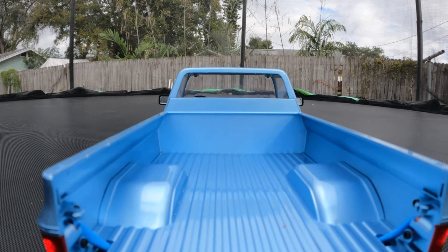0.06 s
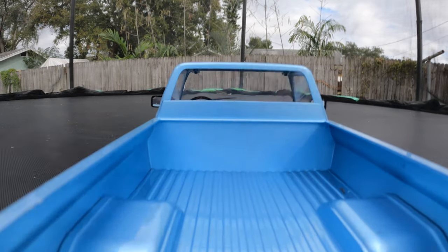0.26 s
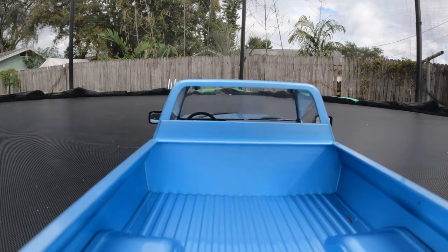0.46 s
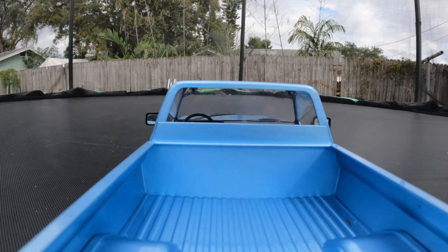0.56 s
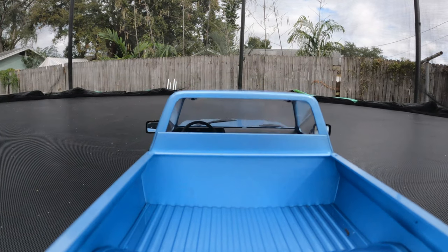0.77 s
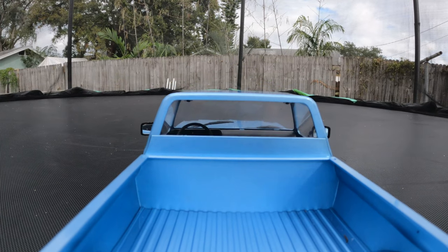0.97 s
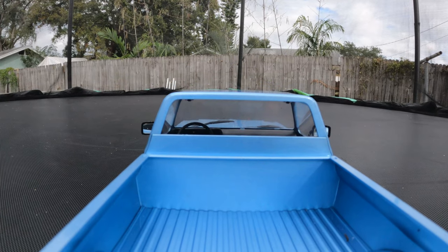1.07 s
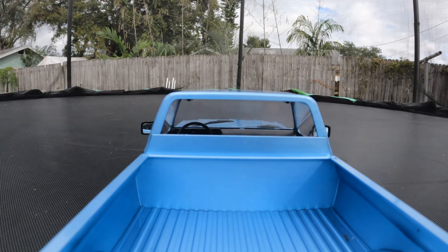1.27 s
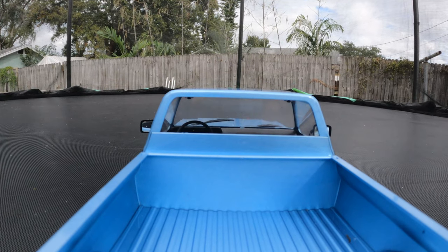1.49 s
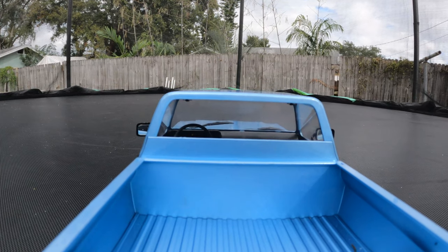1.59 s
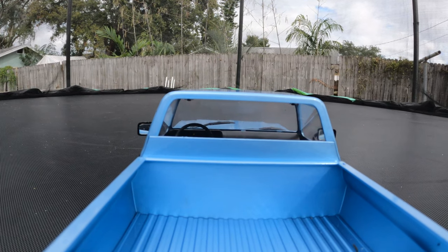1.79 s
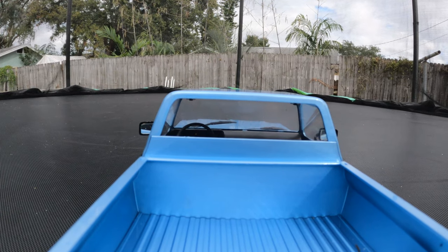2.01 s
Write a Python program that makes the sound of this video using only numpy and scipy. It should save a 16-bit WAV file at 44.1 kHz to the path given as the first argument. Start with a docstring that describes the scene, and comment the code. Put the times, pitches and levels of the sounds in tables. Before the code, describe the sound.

Two brief whining, grinding bursts from a toy truck's motor and gears, with plastic bumps between.

```python
"""Outdoors, a toy truck's small motor gives two short blips in front of a microphone on a springy mat.
The chopped drive current sings at a fixed pitch; gear teeth whine and grind with speed.
The first blip ends in bumps that crack on the plastic shell, thud through the microphone housing
and sway the mat; the shell rustles as it settles. Wind and far traffic fill the gaps."""
import sys
import numpy as np
from scipy import signal
from scipy.fft import rfft, irfft
from scipy.io import wavfile
from scipy.ndimage import uniform_filter1d

SR = 44100
rng = np.random.default_rng(int(sys.argv[2]) if len(sys.argv) > 2 else 0)


def bounce(signal):
    """Save signal as a 16-bit WAV file at the path given by the first command-line argument."""
    frames = np.transpose(np.atleast_2d(signal))
    limited = np.clip(frames, -1, 1)
    pcm = np.round(limited * 32767).astype(np.int16)
    wavfile.write(sys.argv[1], SR, pcm)


N = 90404
TIME_S = np.arange(N) / SR
LEFT_RIGHT = np.array([[1], [-1]])


def undb(db):
    """dB to gain."""
    return 10 ** (np.asarray(db) / 20)


def unit_rms(x):
    """Scale to rms 1."""
    return x / np.sqrt(np.mean(x ** 2) + 1e-18)


def gain_at(curve, hz):
    """Gain of a (Hz, dB) curve, interpolated over log frequency."""
    points_hz, points_db = np.array(curve).T
    return undb(np.interp(np.log(np.maximum(hz, 1)), np.log(points_hz), points_db))


def colour(x, curve):
    """Filter by a (Hz, dB) curve."""
    return irfft(rfft(x) * gain_at(curve, np.arange(N // 2 + 1) * SR / N), N)


def lowpass(x, hz):
    """Zero-phase low-pass."""
    return signal.sosfiltfilt(signal.butter(2, hz, fs=SR, output="sos"), x)


def drift(rate_hz):
    """Smooth random drift, rms 1."""
    width = int(SR / rate_hz)
    return unit_rms(uniform_filter1d(uniform_filter1d(rng.standard_normal(N), width), width))


def mode(x, hz, db, t60_s):
    """One decaying resonance, driven by x."""
    radius, angle = np.exp(-np.log(1000) / (t60_s * SR)), 2 * np.pi * hz / SR
    return undb(db) * signal.lfilter([0, np.sin(angle)], [1, -2 * radius * np.cos(angle), radius ** 2], x)


def blip_curves(blips):
    """Each column over time, and a gate open during each blip."""
    rows = np.vstack(blips)
    curves = [np.interp(TIME_S, rows[:, 0], column) for column in rows.T[1:]]
    gate = sum((TIME_S >= blip[0][0]) & (TIME_S < blip[-1][0]) for blip in blips)
    return curves, uniform_filter1d(1. * gate, size=110)


# Background spectrum. Each row: frequency in Hz, gain in dB.
AIR_SPECTRUM = [(12, -40.5), (20, -17), (41, -4.5), (64, -6.5), (185, -17), (324, -31), (372, -35.5),
                (465, -43), (834, -45), (1300, -38), (2270, -50.5), (3450, -61.5), (15500, -74)]
# Gusts. Each row: time in seconds, rumble gain in dB.
GUSTS = [(0, 1.5), (.12, 3), (0.351, 6.5), (.6, -3), (0.898, -2.5), (1.101, -3), (1.3, -2.5), (1.499, 0),
         (1.801, 5), (2.05, -1)]


def wind_and_traffic():
    """Gusty wind rumble, alike in both channels, under a wide hiss of far traffic."""
    mid, side = (colour(rng.standard_normal(N), AIR_SPECTRUM) for _ in range(2))
    side = signal.lfilter(*signal.butter(1, 349.4, "high", fs=SR), side)
    air = undb(-49) / np.std(mid) * (mid * undb(0.5 * LEFT_RIGHT) + side * LEFT_RIGHT)
    rumble = lowpass(air, hz=423)
    hiss = air - rumble
    gust_db = np.interp(TIME_S, *np.array(GUSTS).T)
    return rumble * undb(gust_db + 1.5 * drift(rate_hz=60)) + hiss * undb(0.54 * gust_db)


# Drive current, one list per blip. Each row: time in seconds, level in dB, duty as a fraction.
DRIVE_BLIPS = [
    [(.144, -36, 0.048), (.175, -35.5, 0.07), (.2, -34.5, 0.38), (.27, -34, 0.51), (.33, -31.5, 0.45),
     (.372, -30.5, 0.39)],
    [(1.528, -32, 0.046), (1.538, -30.5, 0.036), (1.56, -29, 0.037), (1.58, -32, 0.42), (1.65, -33, 0.36),
     (1.7, -29, 0.17), (1.75, -26.5, .18), (1.798, -26, .18)],
]
# Motor can response in dB per chop harmonic, fundamental first.
MOTOR_CAN_DB = [-2, 0, -3, -11, -15, -17, -19, -35, -38, -41, -43, -42, -44, -54]


def motor_drive(chop_hz=621.9):
    """Chopped current sings in the motor can: fixed pitch, harmonics weighted by the duty."""
    (level_db, duty), gate = blip_curves(DRIVE_BLIPS)
    half_pulse_rad = np.pi * np.clip(duty, .01, .5)
    phase = 2 * np.pi * chop_hz * TIME_S - half_pulse_rad
    tone = sum(undb(db) * np.sin(k * half_pulse_rad) * np.cos(k * phase + rng.uniform(0, 2 * np.pi))
               for k, db in enumerate(MOTOR_CAN_DB, start=1))
    return tone * undb(level_db) * gate


# Gear motion, one list per blip. Each row: time in seconds, tooth rate in Hz, whine gain in dB,
# grind gain in dB, grind treble gain in dB.
GEAR_BLIPS = [
    [(.15, 296.4, -35, -51.5, -22), (.18, 598, -59, -37.5, -33), (.215, 1199, -35.5, -27.5, -10),
     (.24, 1827, -30.5, -29.5, -3.5), (.255, 2120, -20.5, -30, -4.5), (.266, 2232, -13.5, -29.5, 4),
     (.282, 1946, -23, -23.5, -3), (.297, 1466, -18.5, -33, 2.5), (.313, 1315, -16.5, -29, -2),
     (.34, 1446, -18.5, -29, -0.5), (.374, 1685, -33, -29, -9), (.383, 1494, -58, -57.5, 14),
     (.4, 1000, -95, -42.5, -6)],
    [(1.545, 194.9, -75, -48, -41.5), (1.565, 415.7, -29, -39.5, -23), (1.585, 673.4, -26, -32, -14),
     (1.6, 940.4, -28.5, -34.5, -2.5), (1.615, 1179, -23, -25, -10), (1.638, 1216, -22, -29.5, -4),
     (1.648, 1060, -20.5, -28, -3.5), (1.661, 863, -35, -23, -17), (1.672, 687, -17, -34, -7),
     (1.69, 607.4, -25, -31.5, -14), (1.715, 528.7, -24.5, -35, -12), (1.74, 460.6, -28.5, -36.5, -29),
     (1.755, 403, -32, -48.5, -17), (1.8, 196.9, -55, -45.5, -34.5)],
]
# Gain in dB per tooth harmonic, fundamental first.
TOOTH_HARMONICS_DB = [-2, 0, -5, -8, -15, -18]
# Gear case response. Each row: frequency in Hz, gain in dB.
CASE_RESPONSE = [(300, -14.5), (900, -19), (1250, -11), (1550, -20.5), (1900, 4.5), (2300, -10),
                 (2700, -10), (3150, -2), (3400, -6), (3700, 7.5), (4100, -18), (4900, -14), (5300, -0.5),
                 (5700, -10.5), (6100, -5), (6600, -11.5), (7200, -7), (8500, -19.5), (9700, -16),
                 (11000, -26), (12200, -21), (15500, -54.5)]
# Grit spectrum before the case. Each row: frequency in Hz, gain in dB.
GRIT_SPECTRUM = [(100, -28.5), (400, 3), (1000, 2), (3000, -4.5), (8000, -3), (15000, -12.5)]


def gears(teeth=9.9, jitter=.013, wobble_db=3.8):
    """Teeth whine through the case, grind with one throb per shaft turn and shake the chassis."""
    (tooth_hz, whine_db, grind_db, treble_db), gate = blip_curves(GEAR_BLIPS)

    def tooth_phase():
        return 2 * np.pi * np.cumsum(tooth_hz * (1 + jitter * drift(rate_hz=512))) / SR

    shaft_phase = tooth_phase() / teeth
    whine = 0
    for k, db in enumerate(TOOTH_HARMONICS_DB, start=1):
        gain = undb(db + wobble_db * drift(rate_hz=130)) * gain_at(CASE_RESPONSE, k * tooth_hz)
        whine += gain * np.sin(k * tooth_phase() + rng.uniform(0, 2 * np.pi))
    throb = (1 + .2 * np.sin(shaft_phase)) * undb(1.1 * drift(rate_hz=230))
    grit = colour(rng.standard_normal(N) * throb, GRIT_SPECTRUM)
    grit = unit_rms(colour(grit, np.array(CASE_RESPONSE) * [1, 0.59]))  # case colours grit less
    low, below_top = lowpass(grit, hz=4167), lowpass(grit, hz=12800)
    treble, top = below_top - low, grit - below_top
    grind = low + undb(treble_db) * treble + undb(2.5 * treble_db) * top
    whirr = undb(whine_db) * whine + undb(grind_db) * grind
    chassis = unit_rms(mode(rng.standard_normal(N), hz=233, db=0, t60_s=0.064))
    shudder = chassis * undb(grind_db + treble_db - 14.5)
    return whirr * gate, shudder * gate


# Plastic shell modes. Each row: frequency in Hz, gain in dB, t60 in seconds.
SHELL_MODES = [(942, 0, 0.0028), (1272, -2.5, 0.0087), (1713, -1.5, 0.012), (2120, 3, 0.005),
               (2598, 7.5, 0.0031), (3235, 3, 0.003), (3514, -1, 0.011), (4540, -9.5, 0.0087),
               (6150, -9, 0.0089), (6800, -19, 0.006)]
CONTACT_CUTOFF_HZ = 5500


def shell(contact, centre_hz=2000, spread_oct=9, t60_scale=1):
    """Contacts ring the shell's modes, weighted around a centre; a little contact is heard bare."""
    ringing = 0
    for hz, db, t60_s in SHELL_MODES:
        weight = np.exp(-(np.log2(hz / centre_hz) / spread_oct) ** 2)
        ringing += weight * mode(contact, hz, db, t60_s * t60_scale)
    return ringing / len(SHELL_MODES) + undb(-14) * np.diff(contact, prepend=0)


# Shell rustles. Each row: start, peak and end in seconds, level in dB, centre in Hz, spread in octaves.
RUSTLE_SWELLS = [(0.357, 0.426, 0.57, -37.5, 2550, 1.46), (0.475, 0.474, 0.526, -49, 2000, 0.33),
                 (0.542, 0.637, 0.684, -61.5, 2130, 1.9), (.755, 0.76, 0.82, -69, 1890, 0.57),
                 (0.759, 0.836, 0.95, -55.5, 2700, 0.52), (0.817, 0.858, 0.96, -57.5, 1600, 0.61),
                 (0.955, 0.981, 1.114, -62.5, 1555, 0.37), (0.994, 1.032, 1.04, -65, 1530, 0.46),
                 (1.787, 1.809, 1.83, -67.5, 5500, 0.65)]


def rustles(contacts_per_s=8000):
    """Swells of dense, light contacts, which ring the shell longer than blows do."""
    out = np.zeros(N)
    for start_s, peak_s, end_s, db, centre_hz, spread_oct in RUSTLE_SWELLS:
        hits = rng.random(N) < contacts_per_s / SR
        grains = hits * rng.standard_normal(N) * undb(0.5 * drift(rate_hz=70))
        grains = signal.lfilter(*signal.butter(1, CONTACT_CUTOFF_HZ, fs=SR), grains)
        swell = np.interp(TIME_S, [start_s, peak_s, end_s], [0, 1, 0]) ** 2
        out += unit_rms(shell(grains, centre_hz, spread_oct, t60_scale=2.2)) * undb(db) * swell
    return out


# Bumps. Each row: start in seconds, then crack, thud and sway excitation in dB.
BUMP_HITS = [(0.3644, -14, -18, -47), (0.3747, -11, -9, -21), (.379, -35, -1.5, -22.5),
             (0.4048, -9.5, -44, -40), (0.4094, -17, -22, -34), (0.4132, -13.5, -15, -32.5),
             (0.4252, -9, -12.5, -25), (0.4298, -41, -17.5, -42.5), (0.4425, -19.5, -49, -27.5),
             (0.4449, -29, -11.5, -27.5), (0.46, -52, -25.5, -23.5), (.473, -38, -32, -48),
             (0.5, -34, -41, -43), (0.563, -38, -32, -55.5), (1.675, -55, -24.5, -17),
             (1.723, -58, -76.5, -27.5), (1.753, -55, -39, -47.5)]
# Microphone housing modes. Each row: frequency in Hz, gain in dB, t60 in seconds,
# gain of the inverted left channel in dB, signed swing factor.
HOUSING_MODES = [(162, -17, 0.18, -22.5, -2.4), (288.3, 13, 0.042, -11, 0.96),
                 (440.4, 15.5, 0.022, -9, -0.5), (926, 5, 0.029, -10.5, 0.62)]
# Mat modes. Each row: frequency in Hz, gain in dB, t60 in seconds.
MAT_MODES = [(52.6, -2.5, 0.14), (89.5, -7.5, 0.16)]


def bumps(crack_rise_s=.0015):
    """Each bump cracks on the shell, thuds through the microphone housing and sways the mat."""
    crunch, knock, push = np.zeros((3, N))
    age = np.arange(800) / SR / crack_rise_s
    for start_s, crack_db, thud_db, sway_db in BUMP_HITS:
        i = int(start_s * SR)
        crunch[i:i + len(age)] += undb(crack_db) * rng.standard_normal(len(age)) * age * np.exp(-age)
        knock[i:i + 12] -= undb(thud_db) / 24
        push[i:i + 120] -= undb(sway_db) / 120
    crack = shell(signal.lfilter(*signal.butter(2, CONTACT_CUTOFF_HZ, fs=SR), crunch))
    thud = sum(swing * mode(knock, hz, db, t60_s) * np.array([[-undb(left_db)], [1]])
               for hz, db, t60_s, left_db, swing in HOUSING_MODES)
    sway = sum(mode(push, *row) for row in MAT_MODES)
    return crack, thud, sway


def truck_bed(truck, t60_s=.11, cutoff_hz=1600):
    """The bed returns an early echo and a short dull ring to each channel."""
    age_s = np.arange(SR // 4) / SR
    tails = signal.lfilter(*signal.butter(1, cutoff_hz, fs=SR), rng.standard_normal((2, len(age_s))))
    tails *= 1000 ** (-age_s / t60_s)
    ring = np.array([signal.fftconvolve(truck, tail / np.linalg.norm(tail))[:N] for tail in tails])
    echo = np.array([np.roll(truck, lag_samples) for lag_samples in (53, 31)])
    return undb(-13) * echo + undb(-11) * ring


def direct_path(truck, left_lag_samples=.55):
    """Close sound, slightly louder on the left; the treble flutters between the channels."""
    delay = np.exp(-2j * np.pi * left_lag_samples * np.arange(N // 2 + 1) / N)
    near = np.array([irfft(rfft(truck) * delay, N), truck]) * undb(LEFT_RIGHT)
    treble = signal.sosfilt(signal.butter(2, 6000, "high", fs=SR, output="sos"), truck)
    return near + treble * drift(rate_hz=150) * undb(-8) * LEFT_RIGHT


def scene():
    """Stereo mix of the truck, its low vibrations and the background."""
    whirr, shudder = gears()
    crack, thud, sway = bumps()
    truck = motor_drive() + whirr + crack + rustles()
    vibration = thud + shudder * np.array([[-.4], [1.6]]) + sway * undb(3.4 * LEFT_RIGHT)
    return truck_bed(truck) + direct_path(truck) + vibration + wind_and_traffic()


def record(dry):
    """Round the loudest peaks and cut the top."""
    ceiling, top_hz = .9, 15500
    rounded = ceiling * np.tanh(dry / ceiling)
    return signal.sosfilt(signal.ellip(10, .2, 80, top_hz, fs=SR, output="sos"), rounded)


dry = scene()
out = record(dry)
bounce(out)
```